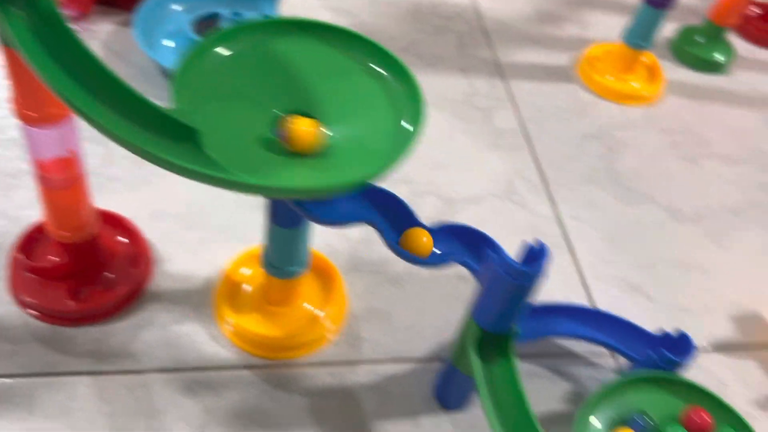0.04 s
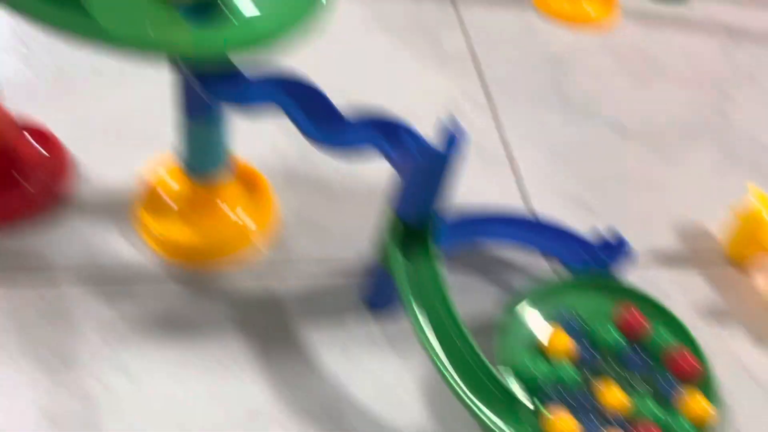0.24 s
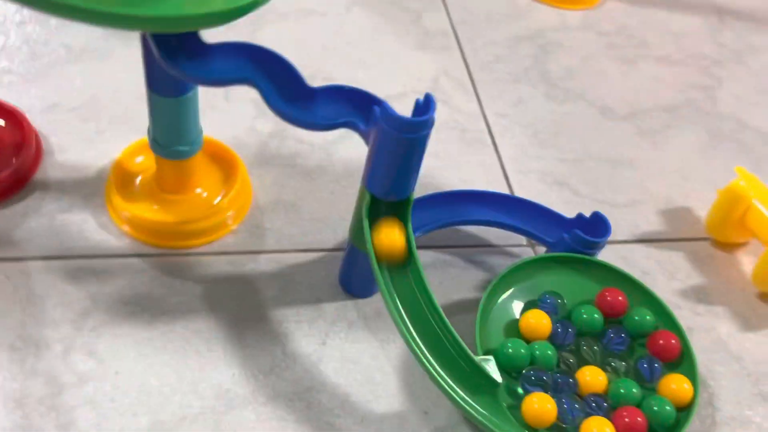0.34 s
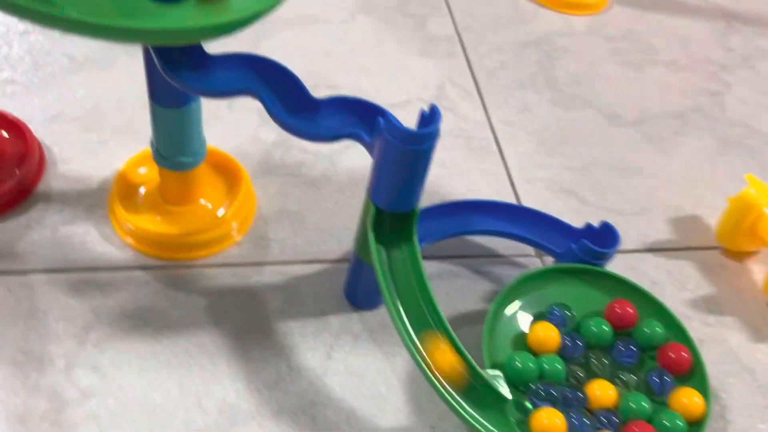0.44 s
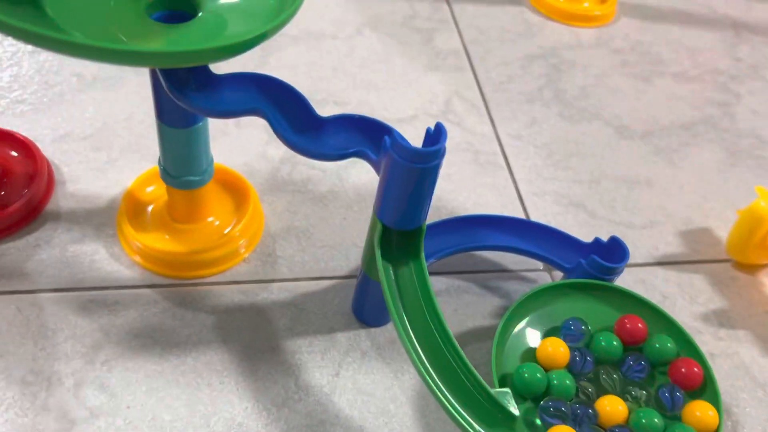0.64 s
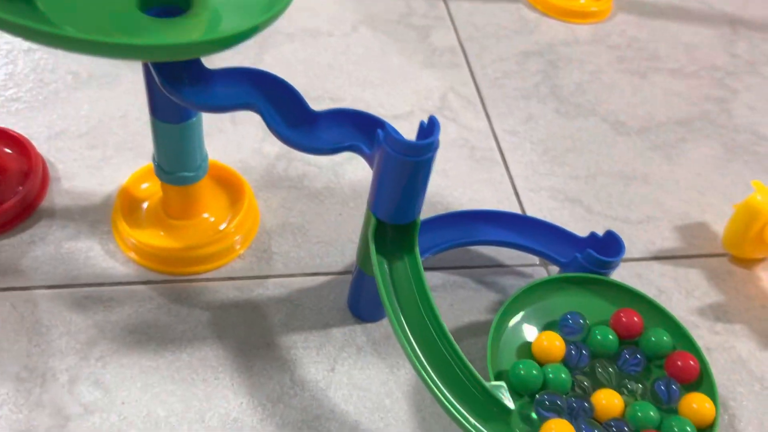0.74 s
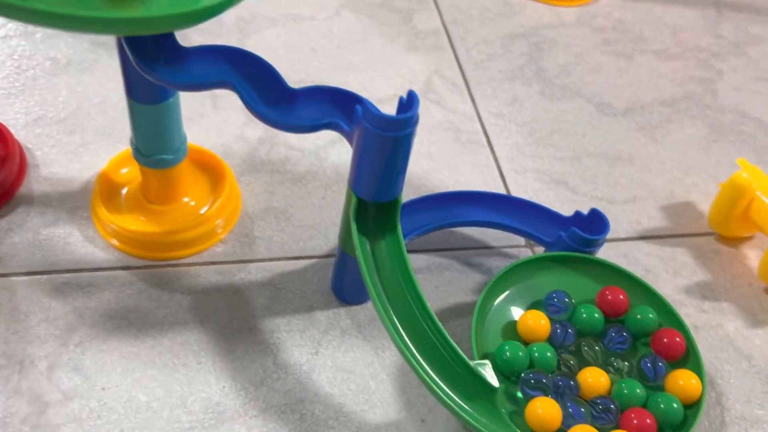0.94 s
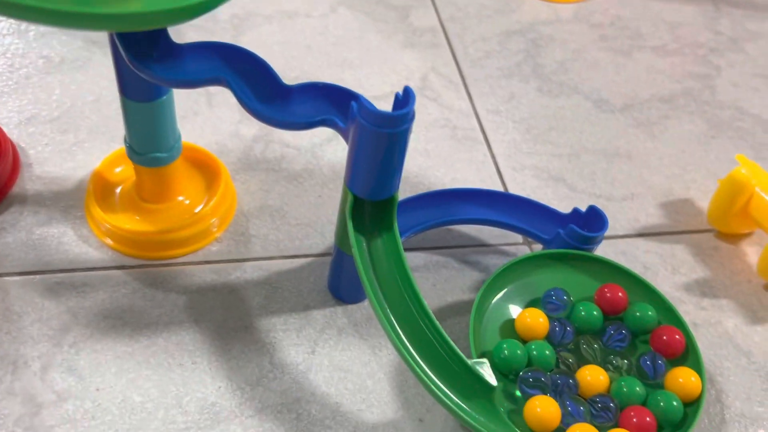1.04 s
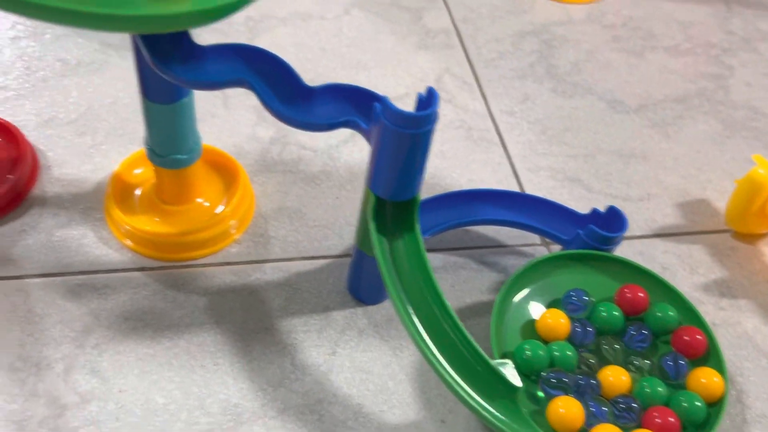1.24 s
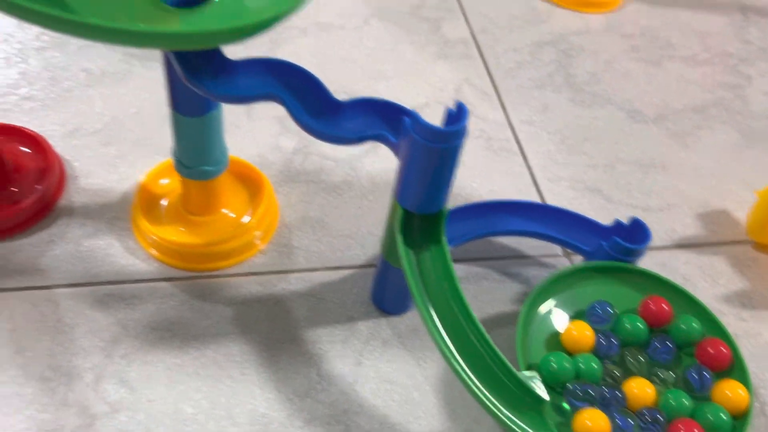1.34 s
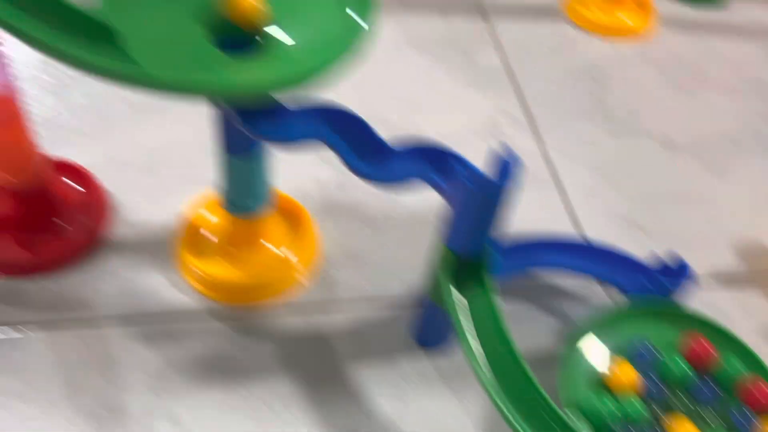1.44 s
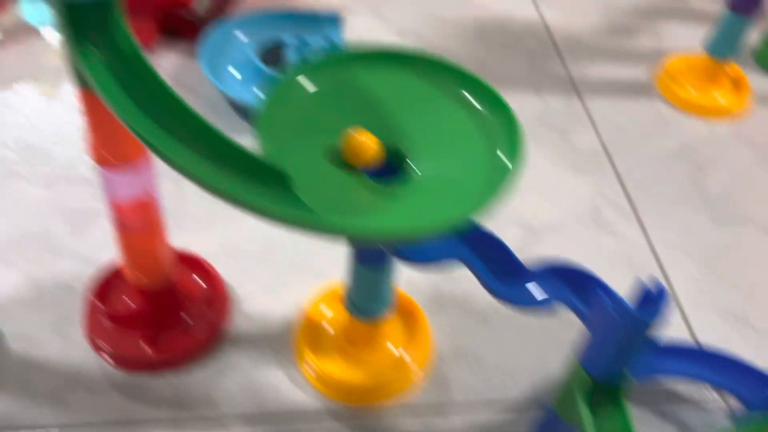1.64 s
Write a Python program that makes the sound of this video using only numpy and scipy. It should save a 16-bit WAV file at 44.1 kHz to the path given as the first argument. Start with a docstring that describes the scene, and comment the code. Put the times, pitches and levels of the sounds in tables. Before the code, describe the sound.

A marble rattles down a plastic tube and clacks sharply into a tray of other marbles. Another keeps circling a plastic funnel with soft rolling and light ticks, heard close by in a slightly echoing room.

```python
"""A marble rattles down a thin plastic tube, runs along a chute and clacks into a tray of marbles.
Another circles in the funnel above, rolling softly and ticking against the wall.
Each contact is a crack plus ringing modes; rolling is a stream of tiny clicks from surface bumps.
Faint scuffs, a low rustle and room air lie beneath. Heard close by, with echoes off a tiled floor."""
import sys
import numpy as np
from scipy import signal
from scipy.fft import rfft, irfft, next_fast_len
from scipy.io import wavfile

SR = 44100
rng = np.random.default_rng(int(sys.argv[2]) if len(sys.argv) > 2 else 0)


def inscribe(sig):
    """Save sig as 16-bit PCM at rate SR to the path in sys.argv[1].

    A 1-D sig is mono; a 2-D sig holds one channel per row.
    Samples are clipped to [-1, 1] before scaling.
    """
    pcm = np.round(np.clip(np.atleast_2d(sig).T, -1, 1) * 32767)
    wavfile.write(sys.argv[1], SR, pcm.astype(np.int16))


N = 74970

# Strong modes of tube and track. Each row: frequency in Hz, level in dB, t60 in seconds.
TUBE_MODES = [(1906, -17.5, .06), (2332, -9.5, 0.09), (2920, -16.5, 0.042), (3130, -11.5, 0.048),
              (3636, -14.5, 0.036), (4023, -3, 0.035), (8300, -18, 0.032)]
# Spectra of the dense weak modes. Each row: frequency in Hz, relative level in dB.
TUBE_WEAK_MODES = [(550, -15.5), (1200, -16.5), (2000, -4), (4000, 2.5), (5800, -5.5), (6500, -2),
                   (7400, -1.5), (10000, -12), (12300, -19), (14000, -10), (16000, -20)]
TRAY_WEAK_MODES = [(550, -28), (850, -11.5), (1600, -8.5), (2700, 3), (4500, 0.5), (6000, -12.5),
                   (8000, -7), (10000, -14.5), (12600, -17), (14200, -15), (16000, -25)]


def from_db(db):
    """Decibels to gain."""
    return 10 ** (np.asarray(db) / 20)


def pan(db):
    """Stereo gains, left louder by db."""
    return from_db([[db / 2], [-db / 2]])


def envelope(points):
    """Gain per sample from (seconds, dB) points."""
    return from_db(np.interp(np.arange(N) / SR, *np.transpose(points)))


def at_hz(points, hz):
    """Interpolate a table over log frequency."""
    f, value = np.transpose(points)
    return np.interp(np.log(hz + 1e-9), np.log(f), value)


def cut(x, hz, kind, order=2):
    """Butterworth low-pass or high-pass."""
    return signal.sosfilt(signal.butter(order, hz, kind, fs=SR, output="sos"), x)


def add(track, start_s, sound):
    """Mix a sound in at start_s."""
    i = int(start_s * SR)
    track[i:i + len(sound)] += sound[:max(N - i, 0)]


def diffuse(pair, spectrum):
    """Two independent signals to one coloured stereo field, alike in the bass; rms 1."""
    # Each row: frequency in Hz, left-right coherence.
    coherence = [(50, 0.98), (130, 0.96), (290, 0.66), (700, 0.25), (1400, 0.083), (3000, 0.36),
                 (7000, 0.65), (9600, 1), (10800, 0.71), (15000, 0.51)]
    hz = np.fft.rfftfreq(N, 1 / SR)
    mid, side = rfft(pair) * from_db(at_hz(spectrum, hz))
    alike = at_hz(coherence, hz)
    field = irfft(np.sqrt(1 + alike) * mid + np.sqrt(1 - alike) * side * [[1], [-1]], N)
    return field / np.sqrt(np.mean(field ** 2))


def rings(hz, t60_s, t):
    """One decaying sine per mode."""
    return np.sin(2 * np.pi * np.outer(hz, t)) * np.exp(-np.log(1000) * np.outer(1 / t60_s, t))


def struck(hits, modes, weak_modes, weak_db, weak_t60_s, crack_db, rise_s, treble_hz, pan_db):
    """Each contact cracks, then ringing spreads, its modes mixed anew by where it lands."""
    weak_count, crack_hz, low_cut_hz = 260, 3200, 616
    t = np.arange(SR // 5) / SR
    hz, db, t60_s = np.transpose(modes)
    weak_hz = 500 + (np.arange(weak_count) + rng.random(weak_count)) * 16000 / weak_count
    weak_gain = from_db(at_hz(weak_modes, weak_hz))
    weak_gain *= from_db(weak_db) / np.linalg.norm(weak_gain)
    weak_rings = rings(weak_hz, weak_t60_s * (crack_hz / weak_hz) ** 0.43, t)  # high modes die faster
    crack = cut(cut(1. * (t == 0), crack_hz, "high"), crack_hz, "low", order=1)
    crack *= from_db(crack_db) / abs(crack).max()
    out = np.zeros(N)
    for start_s, level_db, treble_db in hits:
        detune = 1 + 0.016 * rng.uniform(-1.2, 1, len(hz))
        strong = (from_db(db) * rng.choice([-1, 1], len(hz))) @ rings(hz * detune, t60_s, t)
        weak = (weak_gain * rng.choice([-1, 1], weak_count)) @ weak_rings
        hit = crack + (strong + weak) * (1 - np.exp(-t / rise_s))
        hit += (from_db(treble_db) - 1) * cut(hit, treble_hz, "high", order=1)
        add(out, start_s, from_db(level_db) * hit)
    return cut(out, low_cut_hz, "high") * pan(pan_db)


def room_air(level_db=-48.5):
    """Steady rumble and hiss."""
    # Each row: frequency in Hz, relative level in dB.
    spectrum = [(20, -56), (30, -22), (42, 0), (60, 1.5), (110, -6.5), (200, -9), (400, -18.5), (800, -20),
                (2000, -20.5), (5000, -26.5), (8700, -24.5), (10000, -28.5), (11500, -23.5), (14500, -24),
                (16000, -37)]
    return from_db(level_db) * diffuse(rng.standard_normal((2, N)), spectrum)


def low_rustle():
    """Soft low noise that comes and goes."""
    # Each row: time in seconds, level in dB.
    levels = [(0, -76), (.4, -58), (.47, -57), (.56, -63.5), (.85, -59.5), (.98, -47), (1.1, -55.5),
              (1.38, -52.5), (1.52, -58.5), (1.61, -44), (1.7, -49)]
    # Each row: frequency in Hz, relative level in dB.
    spectrum = [(25, -40), (70, -1), (140, -1.5), (300, -12), (600, -18.5), (2000, -56)]
    return envelope(levels) * diffuse(rng.standard_normal((2, N)), spectrum)


def rolling(bumps_per_s=1800, spread_db=1):
    """Marbles roll over tiny bumps, each a faint click in the plastic."""
    # Each row: time in seconds, level in dB.
    levels = [(0, -50.5), (.2, -50.5), (.33, -39), (.45, -46), (.56, -45), (.66, -50.5), (.78, -51),
              (.96, -49.5), (1.15, -54.5), (1.29, -48), (1.4, -51), (1.52, -47.5), (1.7, -57.5)]
    # Each row: frequency in Hz, relative level in dB.
    spectrum = [(400, -10), (800, -17), (1100, -3), (1450, -7.5), (1800, 2), (2050, -2), (2380, 2.5),
                (2900, -2.5), (3320, -2.5), (3650, -6.5), (4500, -5), (6000, -12), (8000, -16.5),
                (16000, -56)]
    sizes = from_db(spread_db * np.minimum(rng.exponential(1, (2, N)), 4))
    signs = rng.choice([-1, 1], (2, N))
    bumps = sizes * signs * (rng.random((2, N)) < bumps_per_s / SR)
    return envelope(levels) * diffuse(bumps, spectrum) * pan(db=3.5)


def funnel_ticks():
    """The circling marble ticks against the funnel wall."""
    # Each row: start in seconds, level in dB, treble in dB.
    hits = [(.001, -42, 6.5), (.2033, -33.5, 7.5), (.7275, -37, -2), (.750, -36.5, 0.5), (.820, -37.5, -5),
            (.940, -39.5, 4), (1.007, -32, -24), (1.015, -34, 8), (1.027, -33, 4), (1.0872, -38, 8.5),
            (1.278, -34, -25), (1.311, -40.5, -3), (1.3666, -40.5, 6.5), (1.46, -34, -1.5),
            (1.5162, -34, -7), (1.531, -35, -4.5), (1.616, -39, -17), (1.682, -41.5, -5)]
    # Each row: frequency in Hz, level in dB, t60 in seconds.
    modes = [(1715, -10, 0.078), (1830, -11.5, 0.12), (2280, -10.5, 0.046), (2428, -5, 0.044),
             (2760, -14, 0.053), (3317, -1, 0.059), (4620, -11.5, 0.069), (4840, -21, 0.043),
             (5270, -22, 0.051), (7600, -15.5, 0.034)]
    # Each row: frequency in Hz, relative level in dB.
    weak_modes = [(550, -29), (1400, -6), (2200, -7.5), (3400, -7), (6000, -27), (16000, -22)]
    return struck(hits, modes, weak_modes, weak_db=-3, weak_t60_s=0.028,
                  crack_db=-13, rise_s=0.0014, treble_hz=3500, pan_db=4.5)


def track_taps():
    """The running marble taps the track lightly."""
    # Each row: start in seconds, level in dB, treble in dB.
    hits = [(.032, -33, -15), (0.1031, -30, -23), (.1125, -32, -24), (0.1772, -34.5, -27),
            (.8086, -33.5, -1)]
    return struck(hits, TUBE_MODES, TUBE_WEAK_MODES, weak_db=2, weak_t60_s=0.031,
                  crack_db=-12, rise_s=0.002, treble_hz=4970, pan_db=4)


def tube_rattle():
    """The marble rattles down the upright tube and bounces on to the chute."""
    # Each row: start in seconds, level in dB, treble in dB.
    hits = [(.2402, -24, 5), (.2485, -22, 2.5), (.2622, -20, -18), (.2682, -19.5, -28), (.2750, -22, -20),
            (.2775, -21.5, 11), (.2805, -18, 5), (.2882, -30, 12), (.3157, -24, 7.5), (.3436, -23.5, -1.5),
            (.3503, -35, -16), (.3725, -28, -22), (.3762, -32, -23)]
    return struck(hits, TUBE_MODES, TUBE_WEAK_MODES, weak_db=6.5, weak_t60_s=0.028,
                  crack_db=2, rise_s=0.00075, treble_hz=5760, pan_db=2.5)


def tray_knocks():
    """The marble hops off the chute into the full tray, which rings."""
    # Each row: start in seconds, level in dB, treble in dB.
    hits = [(.4898, -30.5, -6), (.5154, -25.5, 7), (.5198, -25, -11), (.5641, -17, 4), (.5705, -27.5, 11),
            (.5782, -19, -3), (.5862, -21.5, 2.5), (.5922, -26.5, 4.5), (.6445, -32, -20)]
    # Each row: frequency in Hz, level in dB, t60 in seconds.
    modes = [(2390, -10, 0.088), (2986, -10.5, 0.033), (3124, -23, 0.035), (3290, -10, 0.049),
             (4260, -20, 0.034), (4660, -29, 0.026), (13700, -32, .02)]
    return struck(hits, modes, TRAY_WEAK_MODES, weak_db=6, weak_t60_s=0.026,
                  crack_db=0.5, rise_s=0.00079, treble_hz=5460, pan_db=1.2)


def marble_clacks():
    """Marble hits marble: hard contact, very short ring."""
    # Each row: start in seconds, level in dB, treble in dB.
    hits = [(.5849, -5, -3), (.8088, -31, -4)]
    # Each row: frequency in Hz, level in dB, t60 in seconds.
    modes = [(2330, -10, 0.016), (3200, 0.5, 0.0078), (4840, -4.5, 0.0063), (13500, -9.5, .008)]
    return struck(hits, modes, TRAY_WEAK_MODES, weak_db=1, weak_t60_s=0.007,
                  crack_db=-6, rise_s=0.0004, treble_hz=5500, pan_db=0.4)


def scuffs(peak_share=0.26):
    """Faint rubs and hollow squeaks: noise in one resonance, swelling quickly and fading."""
    # Each row: start in seconds, length in seconds, pitch in Hz, bandwidth in Hz, level in dB.
    rubs = [(0.687, 0.031, 1360, 119, -54.5), (0.856, .11, 1200, 249, -56.5),
            (0.948, 0.073, 3810, 690, -55.5), (1.144, 0.028, 1080, 70, -45),
            (1.213, 0.024, 1107, 80, -51.5), (1.218, 0.035, 1880, 446, -49), (1.249, 0.039, 971, 90, -52),
            (1.27, 0.17, 974, 130, -58), (1.385, 0.028, 1060, 70, -58), (1.475, 0.086, 6700, 2560, -51.5)]
    t, out = np.arange(SR // 3) / SR, np.zeros(N)
    for start_s, length_s, hz, width_hz, db in rubs:
        band = signal.butter(2, [hz - width_hz / 2, hz + width_hz / 2], "band", fs=SR, output="sos")
        noise = signal.sosfilt(band, rng.standard_normal(2 * len(t)))[len(t):]
        age = t / (peak_share * length_s)
        rub = noise * age * np.exp(-age)
        rms = np.sqrt(np.sum(rub ** 2) / (length_s * SR))
        add(out, start_s, from_db(db) * rub / rms)
    return out


def reflections(x, t60_s, level_db, top_hz, delay_s):
    """A decaying wash of echoes, different on each side."""
    t = np.arange(SR // 2) / SR
    echoes = cut(rng.standard_normal((2, len(t))), top_hz, "low", order=1)
    echoes *= np.exp(-np.log(1000) * t / t60_s) * (t > delay_s)
    echoes *= np.sqrt(2 * np.log(1000) / (t60_s * SR))
    return from_db(level_db) * signal.fftconvolve(x, echoes, axes=1)[:, :N]


def scene():
    """The marble run, echoes from the floor and nearby parts, the room and its air."""
    run = tube_rattle() + track_taps() + tray_knocks() + marble_clacks() + funnel_ticks() + scuffs()
    near = reflections(run, t60_s=0.04, level_db=-5, top_hz=7560, delay_s=0.0025)
    room = reflections(run, t60_s=0.42, level_db=-10.5, top_hz=6160, delay_s=0.0047)
    return run + near + room + rolling() + room_air() + low_rustle()


def record(dry, cutoff_hz=16000):
    """Two microphone ports hear the treble out of step; the top is cut."""
    # Each row: frequency in Hz, phase lead of the left port in radians.
    port_phase = [(1500, .2), (3300, .65), (5800, -.7), (7200, -.1), (9400, -2.95), (10700, -3.3),
                  (11700, -6.1), (13800, -6.5), (14700, -9.3), (16000, -9.6)]
    size = next_fast_len(N + SR // 10)
    hz, radians = np.transpose(port_phase)
    lead_rad = np.interp(np.fft.rfftfreq(size, 1 / SR), np.r_[0, hz], np.r_[0, radians])
    heard = irfft(rfft(dry, size) * np.exp(.5j * lead_rad * [[1], [-1]]), size)[:, :N]
    return signal.sosfilt(signal.ellip(10, .2, 80, cutoff_hz, fs=SR, output="sos"), heard)


dry = scene()
out = record(dry)
inscribe(out)
```